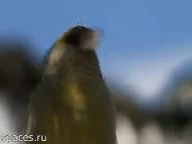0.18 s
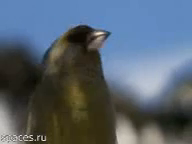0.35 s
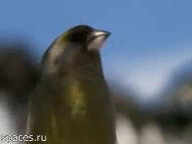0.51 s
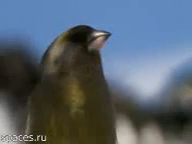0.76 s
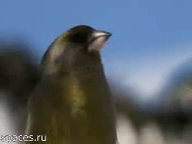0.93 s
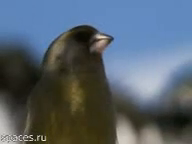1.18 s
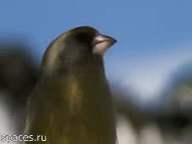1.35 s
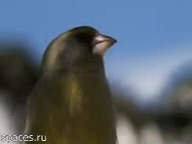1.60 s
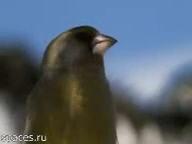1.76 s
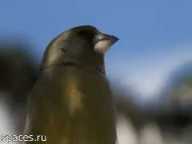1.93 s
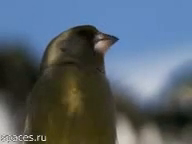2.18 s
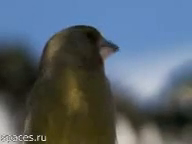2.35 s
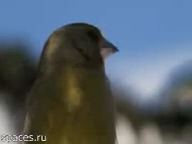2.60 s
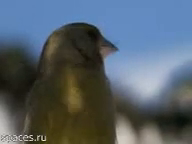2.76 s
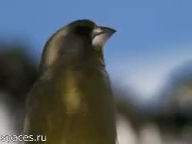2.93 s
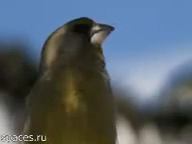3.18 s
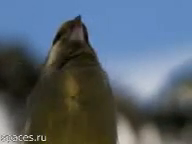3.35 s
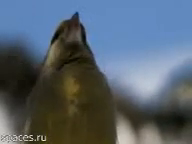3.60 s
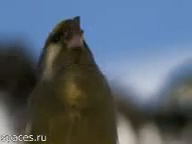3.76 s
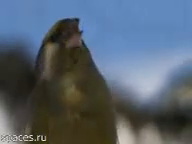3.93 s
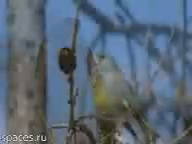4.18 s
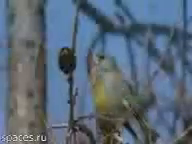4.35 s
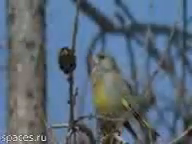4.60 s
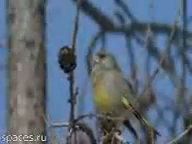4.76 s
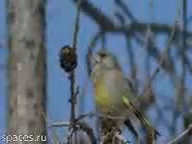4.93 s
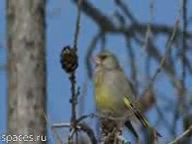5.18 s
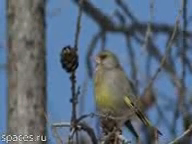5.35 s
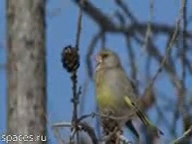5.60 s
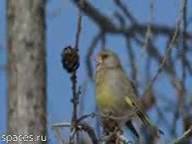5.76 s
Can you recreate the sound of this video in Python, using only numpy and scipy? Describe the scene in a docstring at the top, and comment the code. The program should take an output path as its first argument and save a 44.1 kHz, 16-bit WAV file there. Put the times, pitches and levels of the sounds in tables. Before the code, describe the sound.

Outdoors, a small songbird is caught ending a dry nasal buzz. Steady distant traffic rumble and soft hiss continue while a far engine hums up twice, with a few barely audible bird slurs. A second, longer wheeze swells in loudly and slows as it settles, then stops. Quiet falling chips and short twittering whistles follow, with low wind buffets on the microphone and two tiny twig ticks. Slightly dull top end.

```python
"""A greenfinch is heard mid-wheeze: a buzz made of whistles swept downwards about 145-258 times a second.
A few faint slurs follow while a far engine pulls twice; a second wheeze then swells and settles.
Soft twitter ends the song, falling chips, slurs and three-part calls, each a short pure gliding note.
Over this last part wind shakes the microphone and a twig ticks twice, ringing its modes.
Near surfaces and trees echo the bird; traffic, as shaped noise, and a fading low drone lie beneath it all."""
import sys
import numpy as np
from scipy import signal
from scipy.fft import rfft, irfft
from scipy.io import wavfile
from scipy.ndimage import map_coordinates

SR = 44100
rng = np.random.default_rng(int(sys.argv[2]) if len(sys.argv) > 2 else 0)


def output_pcm(signal):
    """Save a mono or channel-first signal as 16-bit PCM at the path in sys.argv[1].

    Samples are clipped to [-1, 1] before scaling.
    """
    pcm = np.clip(np.atleast_2d(signal).T, -1, 1) * 32767
    wavfile.write(sys.argv[1], SR, np.round(pcm).astype(np.int16))


N = 256662
TIME = np.arange(N) / SR

# the two wheezes, one curve each: (t/s, level/dB before the final trim, sweep rate/Hz)
WHEEZES = [
    [(0.0, -23, 183.7), (0.028, -24.5, 172.8), (0.078, -26.5, 156), (0.092, -24.5, 154.8),
     (0.178, -28.5, 150.8), (0.244, -45, 144), (0.27, -64, 145.6)],
    [(3.34, -54.5, 257.7), (3.416, -36, 253), (3.44, -39, 243.8), (3.482, -30, 239.8), (3.616, -23, 211),
     (3.788, -21, 169.1), (3.882, -23, 153.6), (4.072, -28.5, 150.8), (4.124, -37, 150), (4.15, -60, 149.8)],
]
# how much each wheeze limps: (share 0-1)
WHEEZE_LIMPS = [0.99, 0.27]
SLIDE = 0.73  # share of a sweep spent sliding
LIMP_DB, LIMP_HZ = 3, 220  # in a full limp every second sweep is weaker and starts lower


def wheeze(curve, limp, overlap=1.52, jitter=.027, scatter_db=0.9, pitch_scatter=.022, rasp=0.013,
           throat_hz=4650, throat_width_hz=440, throat_db=8.0, rise=0.34, release=0.37,
           octave_db=-24, air_db=-35, air_hz=5800, air_width_hz=1800):
    """The syrinx flutters: each sweep slides down and rests on its lowest pitch while the next one begins."""
    t = TIME[(TIME >= curve[0][0]) & (TIME <= curve[-1][0])]
    _, flutter_hz = follow(curve, t)
    cycles = np.cumsum(flutter_hz * (1 + jitter * walk(150, t))) / SR
    starts = t[np.flatnonzero(np.diff(np.floor(cycles), prepend=-1))]  # a sweep begins at each whole cycle
    chance = rng.standard_normal((256, 3))  # per sweep: pitch, level, phase
    grit = 1 + rasp * walk(1500, t - t[0])
    air = undb(air_db) * noise(lambda hz: np.exp(-((hz - air_hz) / air_width_hz) ** 2))
    out = np.zeros(N)
    for k, (s, level_db, rate) in enumerate(zip(starts, *follow(curve, starts))):
        u = np.linspace(0, 1, int(overlap * SR / rate))  # progress through the sweep
        at = int(s * SR) + np.arange(len(u))
        top_hz, bottom_hz = sweep_range(level_db, rate)
        top_hz = top_hz * (1 + pitch_scatter * chance[k, 0]) - limp * LIMP_HZ * (k % 2 - .5)
        height = np.cos(np.pi / 2 * np.minimum(u / SLIDE, 1) ** np.sqrt(2)) ** 2
        hz = (bottom_hz + (top_hz - bottom_hz) * height) * grit[at % len(t)]
        ramp = np.clip(np.minimum(u / rise, (1 - u) / release), 0, 1)
        opening = np.sin(np.pi / 2 * ramp) ** 2
        # the throat favours the middle of the sweep; strong and weak sweeps alternate
        throat = throat_db * np.exp(-((hz - throat_hz) / throat_width_hz) ** 2)
        db = throat + scatter_db * chance[k, 1] - limp * LIMP_DB * (k % 2)
        turn = 2 * np.pi * (np.cumsum(hz) / SR + chance[k, 2])
        tone = np.sin(turn) + undb(octave_db) * np.sin(2 * turn)
        out[at] += opening * undb(db) * (tone + air[at])
    # even out to rms 1 over the wheeze's own length, then ride the level curve
    return unit(out) * np.sqrt(len(t) / N) * undb(follow(curve)[0])


# pitch drops with the square of the distance from the settled rate, by HURRY_DROP_HZ at the fast rate
SETTLED_RATE_HZ, FAST_RATE_HZ, HURRY_DROP_HZ = 170, 246, 400
# effort is 1 at FULL_DB and lifts the top of the sweep by REACH_HZ there
FULL_DB, EFFORT_POWER, SOFT_TOP_HZ, REACH_HZ = -19.5, 0.59, 4270, 1030
# sweeps end on REST_HZ; a settled flutter that sinks below FADING_DB stops short, by about SHORTFALL_HZ
REST_HZ, FADING_DB, SHORTFALL_HZ = 3506, -45, 540


def sweep_range(db, rate):
    """Top and bottom Hz of a sweep: wider with effort, lower when the flutter hurries."""
    hurry = (rate - SETTLED_RATE_HZ) / (FAST_RATE_HZ - SETTLED_RATE_HZ)
    effort = undb(db - FULL_DB) ** EFFORT_POWER
    top_hz = SOFT_TOP_HZ + REACH_HZ * effort
    bottom_hz = REST_HZ + SHORTFALL_HZ * max(1 - hurry, 0) / (1 + undb(db - FADING_DB) ** 2)
    return np.array([top_hz, bottom_hz]) - HURRY_DROP_HZ * hurry ** 2


# a run of like falling chips: (t/s, length/s, peak level/dB before the trees)
CHIPS = [(4.352, 0.02, -42.5), (4.415, .018, -44.5), (4.475, 0.028, -48), (4.523, .029, -43),
         (4.548, 0.018, -44.5), (4.599, 0.029, -40.5), (4.674, .024, -40.5), (4.704, 0.014, -48),
         (4.751, 0.029, -43), (4.834, 0.029, -44)]
# calls that rise, fall and trail off: (t/s, level/dB before the trees and the part's own level)
TRIPLE_CALLS = [(5.497, -45), (5.685, -39.5)]
# the three parts of that call: (delay t/s, length/s, start f/Hz, end f/Hz, level/dB against the call)
CALL_PARTS = [(0, .043, 3500, 5030, 0.5), (0.032, .042, 3850, 2700, -1.5), (.066, .075, 2770, 2780, -13)]
# single slurs: (t/s, length/s, start f/Hz, end f/Hz, peak level/dB before the trees)
SLURS = [(1.672, .03, 3750, 4400, -57), (1.78, .019, 3780, 4200, -55.5), (2.577, 0.059, 4680, 3210, -49.5),
         (3.219, .031, 3700, 4330, -47), (4.246, .042, 6900, 5700, -45), (4.988, .024, 6300, 5200, -51.5),
         (5.093, .016, 6050, 4650, -41), (5.117, 0.0054, 4280, 6800, -40.5), (5.191, .02, 5700, 4500, -46),
         (5.231, .027, 3460, 3740, -49), (5.465, 0.035, 3600, 4800, -51.5)]
CHIP_FROM_HZ, CHIP_TO_HZ = 4170, 3040  # the start is for a chip of CHIP_LENGTH_S
CHIP_LENGTH_S, CHIP_RISE_POWER = .028, 0.197  # a chip shorter than this starts higher


def twitter():
    """Short syrinx whistles: the run of chips, the three-part calls and the single slurs."""
    out = np.zeros(N)
    for s, length, db in CHIPS:
        from_hz = CHIP_FROM_HZ * (CHIP_LENGTH_S / length) ** CHIP_RISE_POWER
        out += whistle(s, length, from_hz, CHIP_TO_HZ, db)
    for s, db in TRIPLE_CALLS:
        for delay, length, from_hz, to_hz, part_db in CALL_PARTS:
            out += whistle(s + delay, length, from_hz, to_hz, db + part_db)
    for slur in SLURS:
        out += whistle(*slur)
    return out


SAG = .1  # mid-glide the pitch hangs below the straight line by this share of its span


def whistle(s, length, from_hz, to_hz, db, waver=0.018, fullness=0.52):
    """One short pure note on a sagging glide."""
    out = np.zeros(N + SR)
    u = np.linspace(0, 1, int(length * SR))
    hz = from_hz + (to_hz - from_hz) * u - SAG * abs(to_hz - from_hz) * np.sin(np.pi * u)
    turn = 2 * np.pi * np.cumsum(hz * (1 + waver * walk(300, u * length))) / SR
    envelope = np.abs(np.sin(np.pi * u)) ** fullness
    out[int(s * SR) + np.arange(len(u))] = undb(db) * envelope * np.sin(turn)
    return out[:N]


# near surfaces: (delay t/s, level/dB against the direct sound)
REFLECTIONS = [(.0017, -23.5), (.0071, -18.5)]


def trees(x, wet_db, t60):
    """A few close reflections and a thin scatter from the branches, dying by 60 dB in t60 seconds."""
    t = TIME[:SR // 2]
    response = rng.standard_normal(len(t)) * np.exp(-np.log(1000) * t / t60)
    response *= undb(wet_db) / np.linalg.norm(response)
    response[0] = 1  # the direct sound
    for delay, db in REFLECTIONS:
        response[int(delay * SR)] += undb(db)
    return signal.fftconvolve(x, response / np.linalg.norm(response))[:N]


# twig ticks: (t/s, level/dB, a gain on the ring and crack)
TICKS = [(4.4583, -27), (5.045, -32)]
# modes of the twig: (f/Hz, decay t/s, level/dB within the ring)
TWIG = [(900, .004, 3), (1750, .002, -5), (2550, .002, 0)]


def ticks(push=0.00099, crack_db=-3, crack_s=.0035, crack_hz=1900):
    """Tiny knocks ring the modes of a twig, each with a brief dry crack."""
    out = np.zeros(N)
    t = TIME[:SR // 20]
    ring = sum(undb(db) * np.exp(-t / decay) * np.sin(2 * np.pi * hz * t) for hz, decay, db in TWIG)
    crack = undb(crack_db) * noise(lambda hz: hz / crack_hz * np.exp(-(hz / crack_hz) ** 2))
    onset = 1 - np.exp(-t / push)  # the push takes about a millisecond
    for s, db in TICKS:
        at = int(s * SR) + np.arange(len(t))
        out[at] += undb(db) * onset * (ring + crack[at] * np.exp(-t / crack_s))
    return out


# the strongest wind buffets: (t/s of the middle, length/s, f/Hz, peak level/dB)
BUFFETS = [(3.849, .2, 55.1, -38), (4.46, .06, 139.7, -32), (4.592, 0.042, 94.5, -31),
           (4.681, 0.053, 114.3, -31), (4.723, 0.035, 85.6, -23), (4.875, .029, 73.5, -27.5),
           (5.029, .048, 75, -32.5), (5.137, 0.044, 65.4, -32), (5.561, .08, 75.4, -34)]
# the gust around them: a swell of small random eddies
GUST_S, GUST_LENGTH_S, GUST_DB = 4.77, 0.75, -45


def wind(unsteady=0.25, rumble_db=-13, rumble_hz=115, spread=1.03, eddy_db=4, eddy_rate=18):
    """Each buffet shakes the microphone for a few uneven low cycles inside a gust's softer, fitful rumble."""
    shakes, stir = np.zeros(N), np.zeros(N)
    for s, length, hz, db in BUFFETS:
        near = np.abs(TIME - s) < 3 * length
        t = TIME[near] - s
        uneven_hz = hz * (1 + unsteady * walk(121.4, t - t[0]))
        turn = 2 * np.pi * (np.cumsum(uneven_hz) / SR + rng.random())
        shakes[near] += undb(db) * np.exp(-(2 * t / length) ** 2) * np.sin(turn)
        stir[near] += undb(db) * np.exp(-(t / (spread * length)) ** 2)  # rumble stirred up by the buffet
    gust = swell(GUST_S, GUST_LENGTH_S) * undb(GUST_DB + eddy_db * walk(eddy_rate))
    rumble = noise(lambda hz: (hz / rumble_hz) ** 2 / (1 + (hz / rumble_hz) ** 2) ** np.e)
    return shakes + (undb(rumble_db) * stir + gust) * rumble


# traffic colour: (f/Hz, relative level/dB per Hz)
TRAFFIC = [(15, -48.5), (25, -12.5), (69, -1), (113, -8), (213, -13), (238, -11), (299, -8.5), (401, -10),
           (549, -8), (601, -8.5), (1290, -7.5), (1900, -17.5), (3260, -32), (3820, -37), (5480, -49.5),
           (7120, -63.5), (12100, -120)]
# traffic swells, heard as changes about their mean over the first half: (t/s, roar level/dB, tyre level/dB)
TRAFFIC_LEVEL = [(0.05, -38, -36.5), (0.95, -37.5, -41), (1.58, -38, -38), (1.92, -37, -43),
                 (2.75, -38.5, -42.5), (2.79, -38, -45), (3.71, -38, -44), (4.17, -39, -47),
                 (4.26, -42.5, -49.5), (4.54, -39, -47), (5.57, -39, -45.5), (5.65, -38.5, -48.5)]


def traffic(split_hz=1200, roar_db=-36.5, tyres_db=-39.0, air_db=-66, air_hz=4000, flicker_db=.5):
    """Low roar and brighter tyre noise swell separately over a steady faint hiss."""
    points_hz, points_db = np.transpose(TRAFFIC)

    def colour(hz):
        return undb(np.interp(np.log(hz), np.log(points_hz), points_db))

    def above(hz, edge):
        return 1 / (1 + (edge / hz) ** 8)

    roar_swell, tyre_swell = (c - c[:N // 2].mean() for c in follow(TRAFFIC_LEVEL))
    roar = noise(lambda hz: colour(hz) * np.sqrt(1 - above(hz, split_hz)))
    tyres = noise(lambda hz: colour(hz) * np.sqrt(above(hz, split_hz) * (1 - above(hz, air_hz))))
    air = noise(lambda hz: colour(hz) * np.sqrt(above(hz, air_hz)) * above(hz, air_hz))
    roar = roar * undb(roar_db + roar_swell + flicker_db * walk(8))
    tyres = tyres * undb(tyres_db + tyre_swell + flicker_db * walk(12))
    return roar + tyres + air * undb(air_db)


# far engine, pulling twice: (t/s of the loudest moment, length/s, level/dB rms there, before the throb)
ENGINE_PULLS = [(1.625, 1.3, -41), (2.698, 0.61, -42.5)]
ENGINE_HZ, ENGINE_CLIMB_HZ_PER_S = 115.5, 14  # pitch at the loudest moment, and its climb
DRONE_DB, DRONE_FADE_DB_PER_S = -44, 2.5  # level at the start and its steady fall


def engines(waver=0.016, throb_db=2, drone_hz=75, drone_width_hz=9):
    """One far engine climbs in pitch with each pull, over a lower drone that fades away."""
    hum = np.zeros(N)
    for s, length, db in ENGINE_PULLS:
        hz = (ENGINE_HZ + ENGINE_CLIMB_HZ_PER_S * (TIME - s)) * (1 + waver * walk(14))
        tone = unit(np.sin(2 * np.pi * np.cumsum(hz) / SR))
        hum += tone * swell(s, length) * undb(db + throb_db * walk(10))
    drone = noise(lambda f: np.exp(-((f - drone_hz) / drone_width_hz) ** 2))
    return hum + drone * undb(DRONE_DB - DRONE_FADE_DB_PER_S * TIME)


def undb(db):
    """Decibels to amplitude."""
    return 10 ** (np.asarray(db) / 20)


def unit(x):
    """Scale to rms 1."""
    return x / np.sqrt(np.mean(x ** 2) + 1e-18)


def follow(table, t=TIME):
    """The columns of a curve table at the times t."""
    s, *columns = np.transpose(table)
    return [np.interp(t, s, c) for c in columns]


def walk(rate, t=TIME):
    """Smooth chance with a spread near 1, through `rate` random points a second."""
    steps = rng.standard_normal(4096)
    return map_coordinates(steps, [t * rate], order=3, mode="wrap")


def noise(gain):
    """Noise of rms 1 whose spectrum is the function gain(Hz)."""
    hz = np.maximum(np.fft.rfftfreq(N, 1 / SR), 1)
    return unit(irfft(rfft(rng.standard_normal(N)) * gain(hz), N))


def swell(s, length):
    """A bell-shaped rise and fall around the time s."""
    return np.exp(-(2 * (TIME - s) / length) ** 2)


def scene():
    """The bird among the trees, with the distant road behind it; the twitter is further off and wetter."""
    buzz = undb(0.3) * sum(wheeze(curve, limp) for curve, limp in zip(WHEEZES, WHEEZE_LIMPS))
    song = trees(buzz, wet_db=-14, t60=0.13) + trees(twitter(), wet_db=-6.5, t60=0.24)
    return (song + traffic() + engines() + wind() + ticks())[None]


TOP_HZ = 7050


def record(dry):
    """The recorder cuts the top steeply, above TOP_HZ."""
    return signal.sosfilt(signal.ellip(10, .2, 80, TOP_HZ, fs=SR, output="sos"), dry)


dry = scene()
out = record(dry)
output_pcm(out)
```